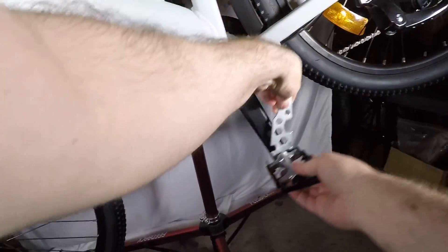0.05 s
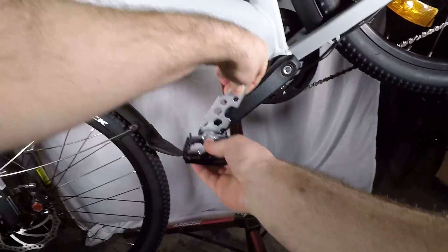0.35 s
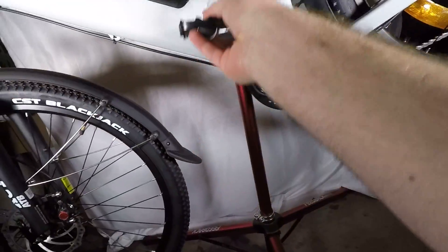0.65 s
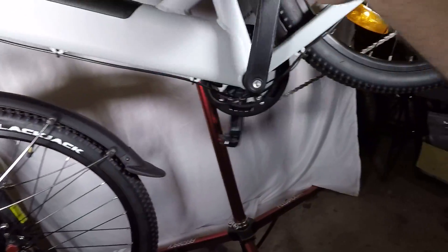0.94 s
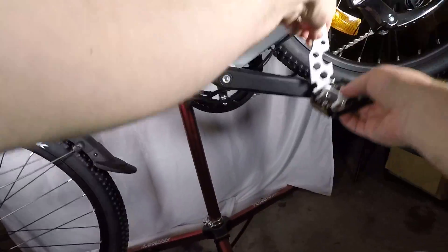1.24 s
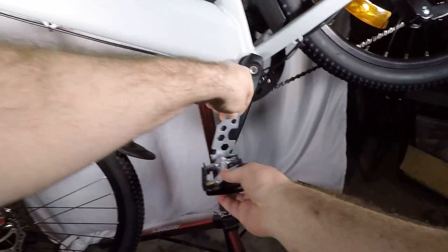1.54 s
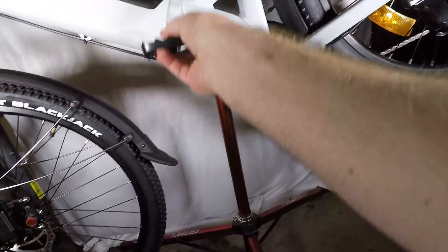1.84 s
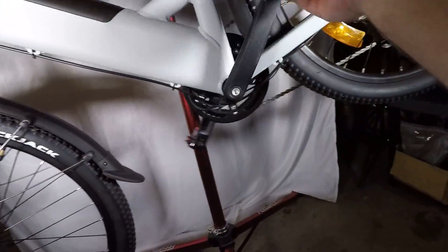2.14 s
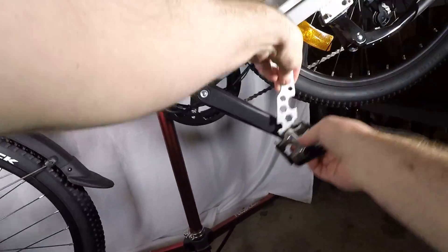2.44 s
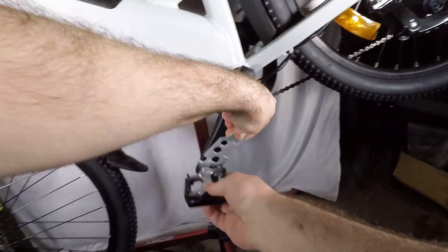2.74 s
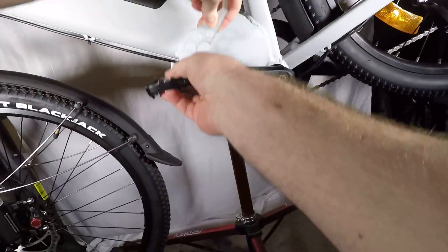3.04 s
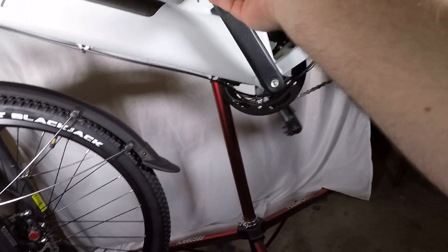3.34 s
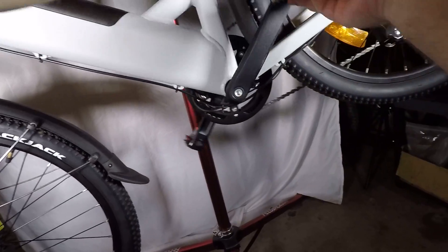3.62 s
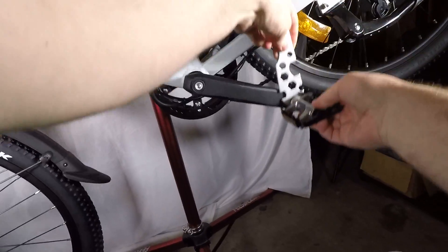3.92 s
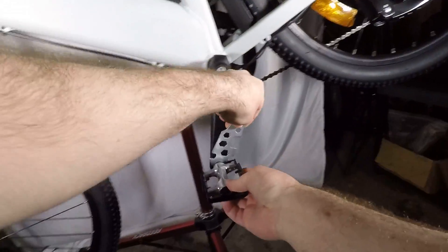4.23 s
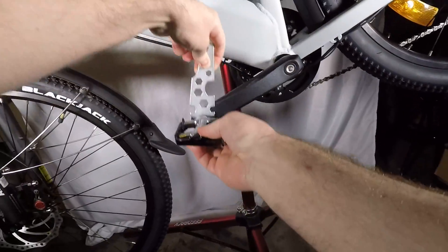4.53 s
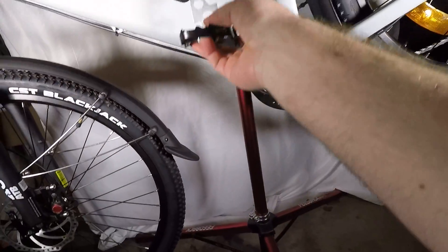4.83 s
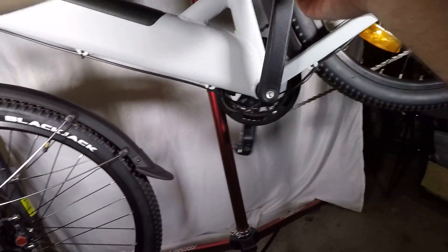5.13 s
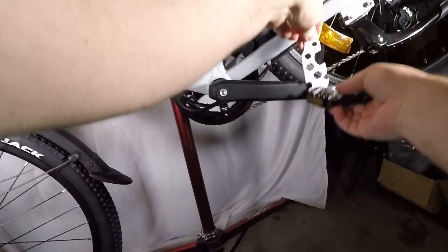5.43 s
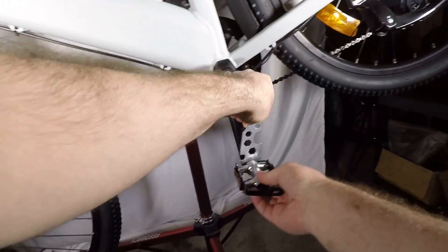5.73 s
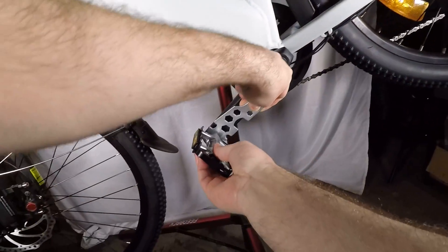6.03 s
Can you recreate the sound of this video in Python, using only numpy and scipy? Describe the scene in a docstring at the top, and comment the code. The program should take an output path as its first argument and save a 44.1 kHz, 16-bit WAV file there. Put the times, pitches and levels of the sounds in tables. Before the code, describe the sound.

Rapid, bright freewheel clicks run throughout at an uneven hand pace, easing briefly a couple of times as a bicycle is back-pedalled on a stand. Clusters of dull knocks and light metallic clacks come from the pedal and a loose wrench, which sometimes rasps on the axle. Soft chain rattle and bearing rumble lie underneath. The microphone is close, in a quiet workshop with almost no echo.

```python
"""A bicycle freewheel ticks as the crank is turned backwards by hand, the bike on a stand.
The sprung pawl snaps over each ratchet tooth at the hand's uneven pace, and the chain snaps and
rustles over its sprockets. A flat wrench held on the pedal axle grinds and now and then clinks;
wrench and pedal knock on the crank. Underneath are bearing rumble, a faint whine and the air of
a small workshop, all heard close up."""
import sys
import numpy as np
from scipy import signal
from scipy.fft import rfft, irfft
from scipy.io import wavfile
from scipy.ndimage import uniform_filter1d

SR = 44100
rng = np.random.default_rng(int(sys.argv[2]) if len(sys.argv) > 2 else 0)


def bounce(signal):
    """Save signal as a 16-bit WAV file at the path given by the first command-line argument."""
    frames = np.transpose(np.atleast_2d(signal))
    limited = np.clip(frames, -1, 1)
    pcm = np.round(limited * 32767).astype(np.int16)
    wavfile.write(sys.argv[1], SR, pcm)


N = 267687

USUAL_PACE = 15  # teeth per second
# The hand's tempo, as ratchet teeth passing the pawl: t/s, rate/Hz
HAND_PACE = [(0.0, 19.02), (0.53, 12.91), (0.86, 14.94), (1.39, 19.88), (1.73, 17.65), (1.97, 19.27),
             (2.04, 15.85), (2.35, 20.06), (2.42, 17.22), (2.81, 16.67), (3.08, 9.33), (3.91, 15.36),
             (4.03, 13.74), (4.1, 18.4), (4.5, 8.53), (4.82, 10.97), (4.89, 15.25), (5.06, 13.73),
             (5.21, 17.22), (5.59, 14.0), (5.85, 15.3), (6.07, 5.52)]
def pace():
    """Teeth per second at every sample."""
    return envelope(HAND_PACE)

# Level ride of the ticks at the usual pace: t/s, level/dB
TICK_LEVEL = [(0, -38.5), (0.35, -40.5), (0.75, -41), (1.0, -38.5), (1.3, -39.5), (1.5, -38.5),
              (1.9, -40.5), (2.3, -38), (2.6, -38), (3.0, -40.5), (3.5, -40.5), (3.95, -40.5), (4.25, -36),
              (4.75, -43), (5.1, -43), (5.35, -38.5), (5.68, -38.5), (5.8, -42), (6.05, -39)]
# The pawl's bright ring: f/Hz, level/dB, t60/s
TICK_MODES = [(3400, -9, 0.0065), (6200, -17, 0.005), (6490, -3, 0.0087), (6900, -5, 0.012),
              (7180, -8.5, 0.018), (9940, -19.5, 0.013), (12200, -21, 0.008), (13300, -25, 0.009)]
def freewheel(db_per_doubling=3.5, uneven_db=1.2, rebound_db=-6.5, rebound_s=0.0029):
    """One crisp snap per ratchet tooth, harder at speed; the sprung pawl chatters as it settles."""
    out, speed = np.zeros((2, N)), pace()
    level_db = envelope(TICK_LEVEL) + db_per_doubling * np.log2(speed / USUAL_PACE)
    teeth = np.floor(0.68 + np.cumsum(speed) / SR)  # starts part-way up a tooth
    for at in np.flatnonzero(np.diff(teeth)):
        db = level_db[at] + uneven_db * rng.standard_normal()
        modes = tilted(TICK_MODES, db_per_octave=2.5 * rng.uniform(-1, 1))
        snap = strike(modes, contact_s=0.00091, grit=1.6, detune=0.024, likeness=0.038)
        chatter = strike(modes, contact_s=0.00044, grit=4.0, detune=0.024, likeness=1.0)
        add(out, at / SR, gain_of(db) * snap)
        add(out, at / SR + rebound_s * rng.uniform(0.42, 1.5), gain_of(db + rebound_db) * chatter)
    return out

# A link snaps hard onto a tooth: t/s, relative level/dB
LINK_SNAPS = [(0.2803, -33), (0.6439, -38), (0.6539, -50), (0.8579, -29.5), (1.0014, -35), (1.2635, -32.5),
              (1.3014, -39), (1.3239, -35.5), (1.4172, -36), (1.4574, -31), (1.7634, -31.5), (1.918, -32),
              (2.079, -34), (2.1295, -35), (2.1854, -37), (2.3444, -33), (2.3894, -33), (2.5267, -32.5),
              (2.6575, -35), (3.5209, -33), (3.7065, -29.5), (4.0552, -34.5), (4.0937, -36),
              (4.1345, -31.5), (4.1654, -27.5), (5.1274, -42), (5.1765, -34), (5.2106, -39), (5.2345, -32),
              (5.6425, -35), (5.7204, -31.5), (5.8277, -27.5)]
# The chain drags along a tooth: t/s, level/dB, decay/s, brightness/(dB per octave)
LINK_DRAGS = [(2.4306, -36.5, 0.0028, 5), (2.4351, -40, 0.02, 4.5), (2.4733, -44, 0.0043, -7),
              (3.709, -39, 0.005, 11), (4.150, -46.5, 0.017, 7), (5.847, -39, 0.0085, -21)]
# A link's dry, broad ring: f/Hz, level/dB, t60/s
CHAIN_MODES = [(2250, 11.5, 0.0049), (3600, 8, 0.007), (4840, 4.5, 0.0046), (5800, -4, 0.027),
               (6400, 0.5, 0.013), (8500, -37, 0.0028), (10600, -17, .003), (13400, -8, 0.0027)]
def chain_links(snap_trim_db=-9, light_db=-49, uneven_db=3.0):
    """Links snap onto teeth, lighter ones at random in between, and rasp where one drags."""
    out = np.zeros((2, N))
    hard = [(s, db + snap_trim_db) for s, db in LINK_SNAPS]
    light = [(s, light_db + uneven_db * rng.standard_normal()) for s in chance_times(per_tooth=0.35)]
    for s, db in hard + light:
        snap = strike(CHAIN_MODES, contact_s=0.0061, grit=2.5, detune=0.067, likeness=0.79)
        add(out, s, gain_of(db) * snap)
    for s, db, decay_s, brightness in LINK_DRAGS:
        modes = tilted(CHAIN_MODES, brightness)
        rasp = strike(modes, contact_s=decay_s, grit=6.2, detune=0.054, likeness=0.15)
        add(out, s, gain_of(db) * rasp)
    return out

NEUTRAL_THUD_HZ = 250  # thud colour that leaves the crank's modes untilted
# The four voices of a knock, each: f/Hz, level/dB, t60/s
WRENCH_CLACK = [(1300, -17, 0.0086), (1380, 10, 0.025), (1530, 18, 0.0082), (1830, 5, 0.0097),
                (1950, -5.5, 0.03), (2660, -17, 0.013), (3160, 9, 0.0066)]
PEDAL_TOCK = [(650, -12, 0.019), (690, -11, 0.0099), (780, -4, 0.0088)]
CRANK_THUD = [(265, -1.3, 0.015), (369, -0.7, 0.029)]
FRAME_BOOM = [(156.5, 8, 0.033), (194, -7, 0.012)]
def blow(thud_db, tock_db, clack_db, lag_s, colour_hz):
    """Wrench clacks, pedal tocks; once the play is taken up the crank thuds and the frame booms."""
    hardness = np.log2(colour_hz / NEUTRAL_THUD_HZ)
    crank_modes = tilted(CRANK_THUD, db_per_octave=41 * hardness)
    boom_db = thud_db + 1 - 19.5 * hardness  # low, soft thuds boom most
    wrench = strike(WRENCH_CLACK, contact_s=0.0013, grit=1.8, detune=0.065, likeness=0.8)
    pedal = strike(PEDAL_TOCK, contact_s=0.00058, grit=1.0, detune=0.13, likeness=0.31)
    crank = strike(crank_modes, contact_s=0.0017, grit=0.6, detune=0.042, likeness=0.79)
    frame = strike(FRAME_BOOM, contact_s=0.0017, grit=0.37, detune=0.008, likeness=0.48)
    out = gain_of(clack_db) * wrench + gain_of(tock_db + 3.5) * pedal
    add(out, lag_s, gain_of(thud_db + 2) * crank - gain_of(boom_db) * frame)  # the frame recoils
    return out

# Knock cues, levels relative: t/s, thud/dB, tock/dB, clack/dB, thud lag/s, thud colour/Hz
KNOCK_CUES = [(0.0891, -26, -39, -30.5, 0.006, 220), (0.1375, -42, -39, -49, 0.0003, 266),
              (0.1749, -21.5, -48, -28, 0.0002, 216), (0.2055, -50.5, -57, -28.5, 0.0005, 241),
              (0.2814, -25, -24, -26.5, 0.00056, 228), (0.2835, -20, -26, -26, 0.00084, 195),
              (0.3396, -13.5, -30.5, -24.5, 0.00041, 233), (0.423, -24, -30, -28.5, 0.00083, 206),
              (0.475, -33.5, -52, -48.5, 0.0004, 306), (0.5203, -35.5, -48, -34, 0.0016, 227),
              (0.6539, -66, -61, -38, 0.0009, 263), (0.879, -32.5, -58, -38, 0.0002, 234),
              (1.2172, -27.5, -62, -37, 0.0027, 290), (1.2394, -32, -45.5, -48, 0.004, 240),
              (1.2719, -29.5, -44, -44, 0.0003, 208), (1.3014, -40.0, -45.5, -40, 0.0035, 339),
              (1.4972, -58, -66, -32, 0.003, 206), (1.6115, -41.5, -49, -32, 0.00025, 213),
              (1.6378, -30, -39, -44, 0.0025, 236), (1.681, -27, -27.5, -26.5, 0.00027, 260),
              (2.0445, -34, -33, -34.0, 0.0031, 337), (2.0676, -32.5, -37, -38, 0.0052, 274),
              (2.0996, -28.5, -37, -30, 0.0029, 260), (2.136, -28.5, -31.5, -33.0, 0.0032, 268),
              (2.1728, -42, -54, -53.0, 0.0003, 239), (2.2078, -27, -41.5, -28.5, 0.0042, 228),
              (2.318, -25, -38, -41, 0.0003, 225), (2.3376, -29.5, -43, -35, 0.002, 202),
              (2.568, -36.5, -45, -38, 0.0095, 218), (2.657, -48, -60, -30, 0.0003, 265),
              (2.6908, -59, -57, -54, 0.0003, 196), (2.708, -30.5, -33, -28, 0.0051, 240),
              (2.7866, -41, -48, -34, 0.00026, 249), (2.804, -23, -32, -31, 0.0043, 297),
              (2.8443, -33.5, -42.0, -43, 0.00026, 231), (2.9124, -28, -43, -37, 0.00048, 230),
              (2.9437, -27, -48, -35, 0.0018, 293), (3.075, -32, -47, -51, 0.0004, 248),
              (3.107, -36, -62, -36.5, 0.0003, 258), (3.3506, -40, -61, -36, 0.00047, 219),
              (3.3627, -43, -55, -42, 0.00061, 195), (3.3754, -36, -42, -33, 0.00038, 253),
              (3.3824, -34, -58.0, -37, 0.00033, 217), (3.4997, -41, -36.5, -36, 0.0008, 271),
              (3.5952, -34, -36, -30, 0.0023, 278), (3.7122, -34, -45.5, -49, 0.0059, 290),
              (3.7408, -34, -42, -51, 0.00025, 283), (3.7752, -40, -57, -34, 0.0031, 287),
              (3.8261, -40, -51, -28, 0.00026, 272), (3.8689, -30.0, -49, -47, 0.0013, 217),
              (3.9472, -32, -48.5, -41, 0.00023, 268), (4.0344, -61, -61, -41, 0.0013, 245),
              (4.1394, -40, -53.5, -36.5, 0.00037, 254), (4.2509, -29.5, -42, -36, 0.00068, 334),
              (4.285, -55, -54, -30, 0.002, 264), (4.343, -34, -31.5, -30.5, 0.00056, 380),
              (4.4436, -25, -29, -25.5, 0.0015, 334), (4.4695, -37, -34, -39, 0.0075, 248),
              (4.4791, -30, -47, -32, 0.002, 271), (4.5103, -38, -58.0, -59.0, 0.00075, 240),
              (4.8065, -48, -53, -33, 0.00061, 270), (4.8346, -32, -43.5, -47, 0.0015, 242),
              (4.8527, -39.5, -57.5, -35, 0.0088, 185), (5.181, -35.5, -37, -37, 0.0028, 312),
              (5.2358, -58, -57, -37, 0.0003, 261), (5.247, -35.5, -44, -36, 0.0068, 376),
              (5.3465, -32, -57, -33, 0.0027, 256), (5.3526, -42, -62, -34, 0.0003, 258),
              (5.3692, -33.0, -52, -51, 0.00075, 275), (5.3899, -27.5, -56, -27, 0.00093, 272),
              (5.4026, -59, -51, -33, 0.0003, 224), (5.4128, -39, -46, -52, 0.0028, 185),
              (5.645, -56, -68, -37, 0.0056, 226), (5.7928, -31, -42, -37, 0.0046, 224),
              (5.829, -53, -62.5, -33, 0.0085, 185), (5.8414, -36.5, -52, -42.0, 0.0003, 183),
              (5.903, -34, -37.5, -28.5, 0.0039, 195), (5.9333, -49, -39, -32.0, 0.0038, 223),
              (6.015, -30.5, -39, -27.5, 0.00028, 384), (6.02, -29.0, -49, -23, 0.00025, 383)]
def knocks(uneven_db=2):
    """Wrench and pedal knock dryly on the crank; very light bumps fall at random in between."""
    out = np.zeros((2, N))
    for s, *voicing in KNOCK_CUES:
        add(out, s, blow(*voicing))
    for s in chance_times(per_tooth=0.3):
        gain = gain_of(uneven_db * rng.standard_normal())
        bump = blow(thud_db=-49, tock_db=-55, clack_db=-52, lag_s=0, colour_hz=NEUTRAL_THUD_HZ)
        add(out, s, gain * bump)
    return greased(out)

# Clink cues: t/s, relative level/dB
CLINK_CUES = [(0.69, -52), (0.7292, -42.5), (2.825, -43), (3.2814, -34), (4.436, -32), (4.6513, -36.5),
              (5.6942, -42)]
# The wrench ringing freely: f/Hz, level/dB, t60/s
WRENCH_RING = [(2020, 0, 0.02), (2210, -8, 0.027), (2470, -7.5, 0.03), (2490, 1, 0.059), (3330, 0, 0.02),
               (3430, -8.5, 0.014)]
def wrench_clinks(trim_db=-2.5):
    """The loose wrench chatters on the axle and rings."""
    out = np.zeros((2, N))
    for s, db in CLINK_CUES:
        ring = strike(WRENCH_RING, contact_s=0.011, grit=0.84, detune=0.025, likeness=0.97)
        add(out, s, gain_of(db + trim_db) * ring)
    return out

# The wrench grinds round on the axle, levels relative: centre t/s, rasp/dB, grind/dB, length/s
RUB_CUES = [(0.322, -41, -45, 0.063), (0.413, -39, -40, 0.041), (1.256, -55, -44, 0.099),
            (1.659, -40.5, -46, 0.14), (2.328, -46.5, -40, 0.084), (3.081, -43, -39.5, 0.074),
            (3.365, -35, -41.5, 0.061), (3.496, -42.5, -45, .06), (4.825, -40, -42.5, 0.11),
            (5.386, -40, -40.5, 0.17), (6.02, -44, -29.5, .05)]
# Midrange ring of rubbed or tapped metal: f/Hz, level/dB, t60/s
METAL_MODES = [(1000, -13, 0.0027), (1330, -12, 0.006), (1510, 4, 0.018), (1650, -3, 0.0072),
               (2010, -3.5, 0.014)]
def wrench_rubs(rasp_trim_db=3.0, grind_trim_db=-1, slips_per_s=180, hiss=0.042):
    """Friction swells and fades in a run of tiny slips: the wrench rasps, the crank grinds below."""
    out = np.zeros((2, N))
    for s, rasp_db, grind_db, length_s in RUB_CUES:
        size = round(length_s * SR)
        slips = rng.uniform(0.5, 1, size) * (rng.random(size) < slips_per_s / SR)
        for modes, db in (METAL_MODES, rasp_db + rasp_trim_db), (CRANK_THUD, grind_db + grind_trim_db):
            body = strike(modes, contact_s=0.0013, grit=0.32, detune=0.085, likeness=0.6)
            force = slips + hiss * pair(rng.standard_normal((2, size)), likeness=0.77)
            friction = signal.fftconvolve(force, body, axes=1)[:, :size]
            add(out, s - length_s / 2, gain_of(db) * unit_rms(friction) * np.hanning(size))
    return out

# Level rides of bearings and axle, both relative: t/s, rumble/dB, rub/dB
DRIVE_LEVELS = [(0.0, -46, -51), (0.32, -45.5, -51.5), (0.59, -46.5, -53.5), (1.08, -43.5, -51.5),
                (1.39, -48, -49.5), (1.91, -46, -53), (2.2, -45, -50.5), (2.55, -48, -53.5),
                (2.94, -43, -50.5), (3.14, -48, -58), (3.89, -47, -50), (4.33, -46.5, -53),
                (4.53, -50, -56.5), (5.22, -45.5, -52), (5.73, -49.5, -55), (6.07, -41.5, -53)]
def chain_rattle(trim_db=3, uneven_db=3.5):
    """Slack links tap lightly on the chainring, harder where the axle rubs more."""
    out, rub_db = np.zeros((2, N)), envelope(DRIVE_LEVELS, column=2)
    for s in chance_times(per_tooth=1.1):
        db = rub_db[round(s * SR)] + trim_db + uneven_db * rng.uniform(-1, 1)
        tap = strike(METAL_MODES, contact_s=0.00055, grit=1.5, detune=0.15, likeness=0.55)
        add(out, s, gain_of(db) * tap)
    return out

def drivetrain(rumble_trim_db=0.5, rub_trim_db=3.0, usual_rustle_db=-52.5, db_per_doubling=5):
    """Bearings rumble, the axle rubs in the wrench, and the chain rustles louder as it runs faster."""
    rumble_db = envelope(DRIVE_LEVELS, column=1) + rumble_trim_db
    rub_db = envelope(DRIVE_LEVELS, column=2) + rub_trim_db
    rustle_db = usual_rustle_db + db_per_doubling * np.log2(pace() / USUAL_PACE)
    bearings = rolling(rumble_db, lo_hz=121, hi_hz=900, grains_per_s=220, spread_db=-1.0, hiss=0.69)
    axle = rolling(rub_db, lo_hz=890, hi_hz=2890, grains_per_s=130, spread_db=15, hiss=0.73)
    chain = rolling(rustle_db, lo_hz=3230, hi_hz=16600, grains_per_s=490, spread_db=0.5, hiss=0.098)
    return bearings + axle + chain

# Tone curve of the drivetrain bed: f/Hz, relative level/dB
BED_EQ = [(59, -49), (100, -37), (143, 6), (172, 0), (359, -3.5), (748, -8), (1110, -5), (1490, -1.5),
          (1800, -4.5), (2100, -6.5), (2520, -12.5), (2920, -18), (3530, -19), (4350, -26), (5260, -24),
          (6620, -18), (7350, -21.5), (8170, -26), (10300, -28), (11200, -35), (13500, -33.5), (15000, -55)]
# How alike the bed is left and right: f/Hz, likeness/(0-1)
BED_LIKENESS = [(100, 0.1), (400, 0.45), (700, 0.66), (1200, 0.77), (2000, 0.38), (4000, 0.71), (6500, 0),
                (10000, 0)]
def rolling(level_db, lo_hz, hi_hz, grains_per_s, spread_db, hiss, grain_s=0.0032):
    """Many tiny contacts of uneven size over a smooth hiss, in one band of the drivetrain's tone."""
    hz = np.fft.rfftfreq(N, 1 / SR)
    sizes = gain_of(np.minimum(spread_db * rng.exponential(1, N), 10))
    grains = sizes * (rng.random(N) < grains_per_s / SR)
    power = signal.lfilter([1], [1, -np.exp(-1 / (grain_s * SR))], grains ** 2)
    contacts = rng.standard_normal((2, N)) * np.sqrt(power / power.mean() + hiss)
    spectrum = pair(rfft(contacts), curve(BED_LIKENESS, hz))
    band = 1 / np.sqrt((1 + (lo_hz / (hz + 1)) ** 8) * (1 + (hz / hi_hz) ** 8))
    bed = irfft(spectrum * band * gain_of(curve(BED_EQ, hz)), N)
    return gain_of(level_db) * unit_rms(bed)

def whine(centre_hz=8931, width_hz=85, level_db=-72.5):
    """A faint, fuzzy, steady whine: a narrow band of noise."""
    hz = np.fft.rfftfreq(N, 1 / SR)
    spectrum = rfft(rng.standard_normal((2, N))) / (1 + ((hz - centre_hz) / width_hz) ** 2)
    return gain_of(level_db) * unit_rms(irfft(spectrum, N))

def room_tone(level_db=-51, top_hz=105):
    """The deep, still air of the workshop."""
    hz = np.fft.rfftfreq(N, 1 / SR)
    air = rfft(pair(rng.standard_normal((2, N)), likeness=1.0)) / (1 + (hz / top_hz) ** 10)
    return gain_of(level_db) * unit_rms(irfft(air, N))

# The workshop's tight decay: f/Hz, t60/s
ROOM_DECAY = [(150, 0.091), (1000, 0.042), (6000, 0.085), (14000, 0.0099)]
def workshop(x, reflections_per_s=3000, predelay_s=0.003, size=16384):
    """Sparse reflections from nearby things, each band dying at its own speed."""
    taps = rng.standard_normal((2, size)) * (rng.random((2, size)) < reflections_per_s / SR)
    taps *= np.arange(size) > predelay_s * SR
    hz, t, bands = signal.stft(taps, SR, nperseg=256)
    decay = gain_of(-60 * t / curve(ROOM_DECAY, hz)[:, None])
    _, tail = signal.istft(bands * decay, SR, nperseg=256)
    return signal.fftconvolve(x, tail / np.linalg.norm(tail[0]), axes=1)[:, :N]

def strike(modes, contact_s, grit, detune, likeness, size=4096):
    """A blow with a short gritty contact rings a part; no two blows meet it at the same spot."""
    t = np.arange(size) / SR
    hz, db, t60 = np.transpose(modes)[:, :, None]
    hz = hz * np.exp(detune * rng.standard_normal(hz.shape))
    ring = (gain_of(db - 60 * t / t60) * np.sin(2 * np.pi * hz * t)).sum(0)
    scuff = pair(rng.standard_normal((2, size)), likeness) * np.exp(-t / contact_s)
    force = grit * unit_rms(scuff) / np.sqrt(size)
    force[:, 0] += 1  # the clean attack
    sound = signal.fftconvolve(force, ring[None], axes=1)[:, :size]
    peak_power = uniform_filter1d((sound ** 2).mean(0), size=128).max()
    return sound / np.sqrt(peak_power)

def tilted(modes, db_per_octave):
    """A harder contact favours the high modes, a softer one the low."""
    return [(hz, db + db_per_octave * np.log2(hz / modes[0][0]), t60) for hz, db, t60 in modes]

def greased(x, top_hz=2900):
    """Greasy, hand-held contacts are too soft to excite the treble."""
    return signal.sosfilt(signal.butter(4, top_hz, fs=SR, output="sos"), x)

def chance_times(per_tooth):
    """Random moments in seconds, denser the faster the crank turns."""
    return np.flatnonzero(rng.random(N) < per_tooth * pace() / SR) / SR

def gain_of(db):
    """Decibels to a factor."""
    return 10 ** (np.asarray(db) / 20)

def unit_rms(x):
    """Scales to rms 1."""
    return x / np.sqrt(np.mean(x ** 2) + 1e-20)

def envelope(points, column=1):
    """Reads one column of a timed table at every sample."""
    columns = np.transpose(points)
    return np.interp(np.arange(N) / SR, columns[0], columns[column])

def curve(points, hz):
    """Reads a table on a log-frequency axis."""
    f, value = np.transpose(points)
    return np.interp(np.log(hz + 1), np.log(f + 1), value)

def add(mix, s, sound):
    """Mixes a stereo sound in at time s."""
    part = mix[:, max(round(s * SR), 0):][:, :sound.shape[1]]
    part += sound[:, :part.shape[1]]

def pair(x, likeness):
    """Makes two unrelated channels partly alike."""
    return np.array([x[0], likeness * x[0] + np.sqrt(1 - likeness ** 2) * x[1]])

# Phase between the two microphone ports: f/Hz, left lead/rad
STEREO_PHASE = [(150, 0), (350, -.5), (600, -2.4), (1200, -3.2), (1700, -3.9), (2000, -5.3), (2600, -6.28)]
# Their balance: f/Hz, left minus right/dB
STEREO_BALANCE = [(150, -0.5), (330, -3.5), (600, 1), (1200, 1), (2200, -0.5), (4500, 0), (6500, 3),
                  (8500, -3.5), (12000, -0.5)]
def stereo_image(x):
    """Two microphone ports hear each frequency with its own phase and balance."""
    left, right = rfft(x, 2 * N)
    hz = np.fft.rfftfreq(2 * N, 1 / SR)
    lead = np.exp(1j * curve(STEREO_PHASE, hz))
    lean = gain_of(curve(STEREO_BALANCE, hz) / 2)
    return irfft(np.array([left * lean, right / lead / lean]))[:, :N]

def scene(tick_send_db=-13, blow_send_db=-16):
    """Bright ticks and dull blows, with a touch of room, over the drivetrain bed."""
    ticks = freewheel() + chain_links() + wrench_clinks()
    blows = knocks() + greased(wrench_rubs() + chain_rattle())
    reflections = workshop(gain_of(tick_send_db) * ticks + gain_of(blow_send_db) * blows)
    return stereo_image(ticks + blows + reflections + drivetrain() + whine() + room_tone())

def record(dry, bass_cut_hz=133, leak_db=-27, top_hz=15000):
    """A steep bass cut that lets a little low end through, then a treble limit."""
    hz = np.fft.rfftfreq(2 * N, 1 / SR)
    highpass = 1 / (1 + (bass_cut_hz / (hz + 1)) ** 28)
    shelf = highpass + gain_of(leak_db) * (1 - highpass)
    thinned = irfft(rfft(dry, 2 * N) * shelf)[:, :N]
    lowpass = signal.firwin(127, top_hz, window=("kaiser", 9), fs=SR)
    return signal.oaconvolve(thinned, lowpass[None], "same")

dry = scene()
out = record(dry)
bounce(out)
```